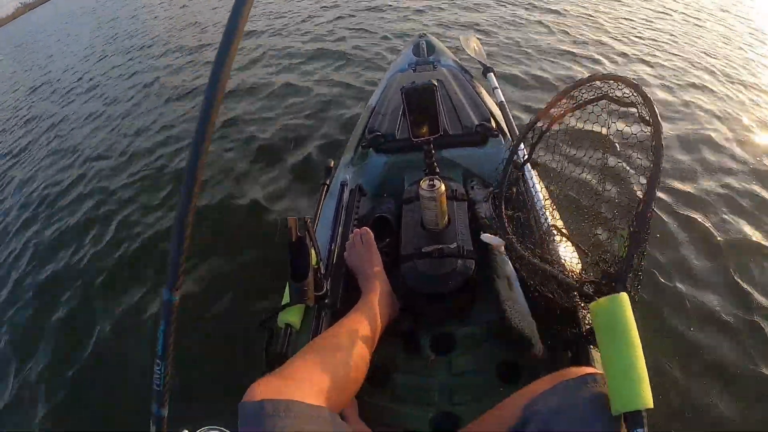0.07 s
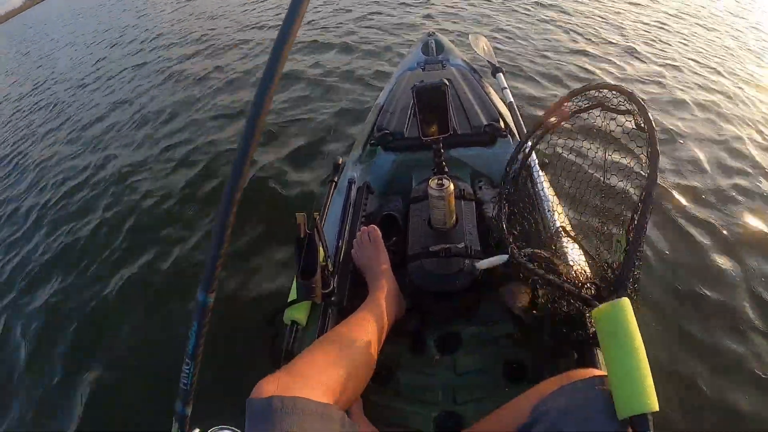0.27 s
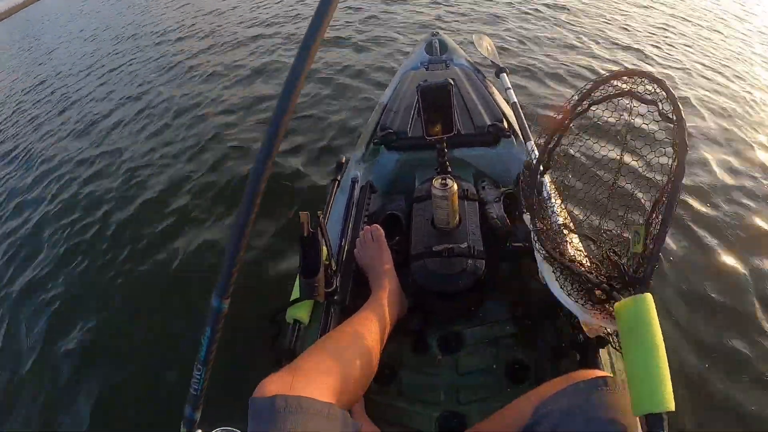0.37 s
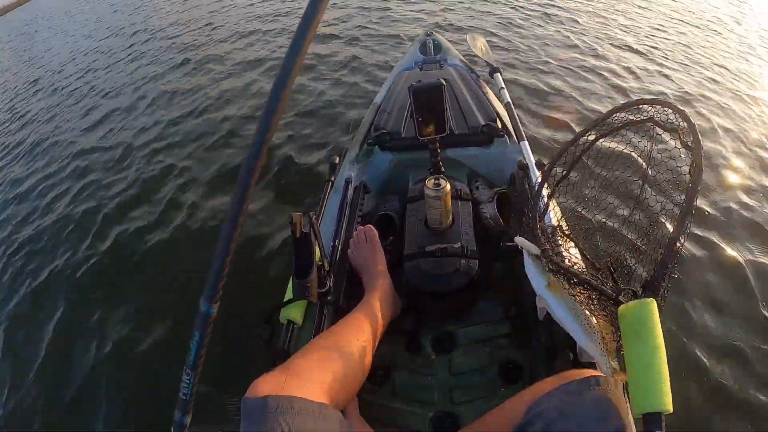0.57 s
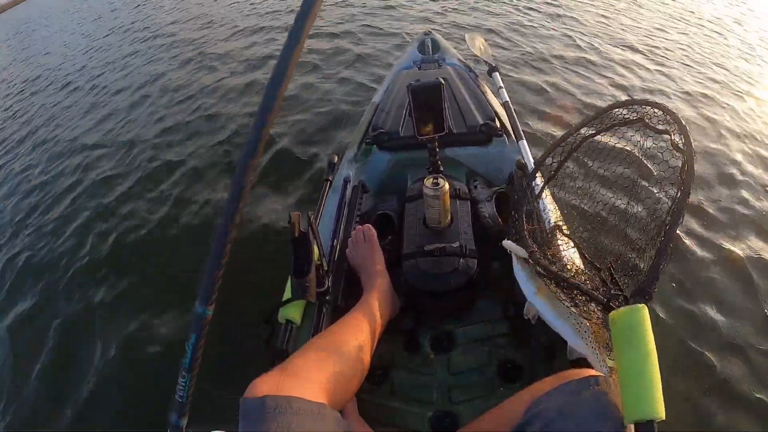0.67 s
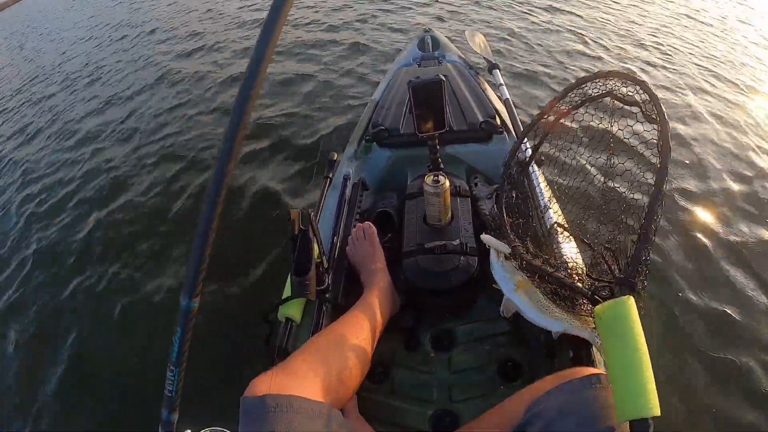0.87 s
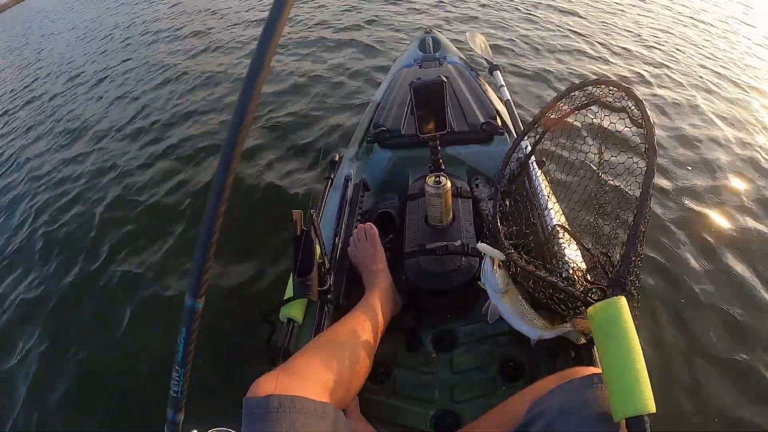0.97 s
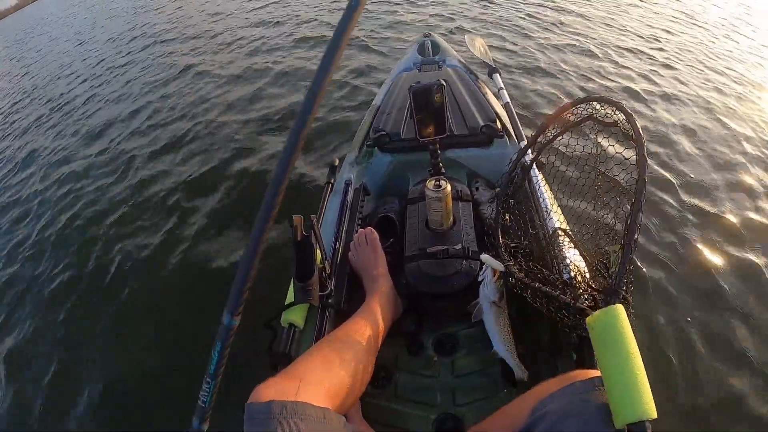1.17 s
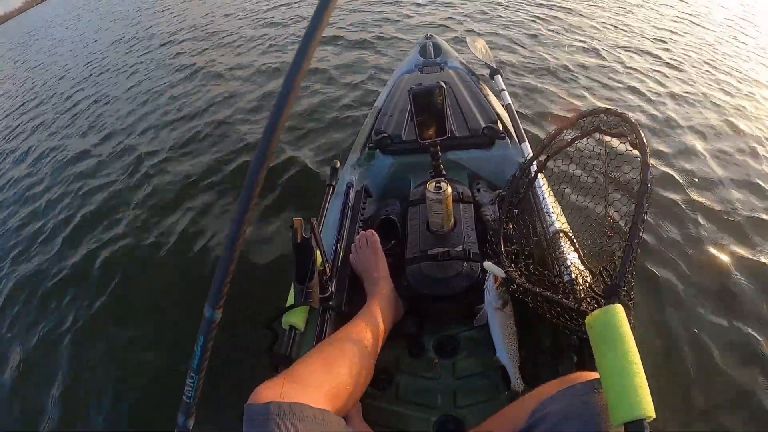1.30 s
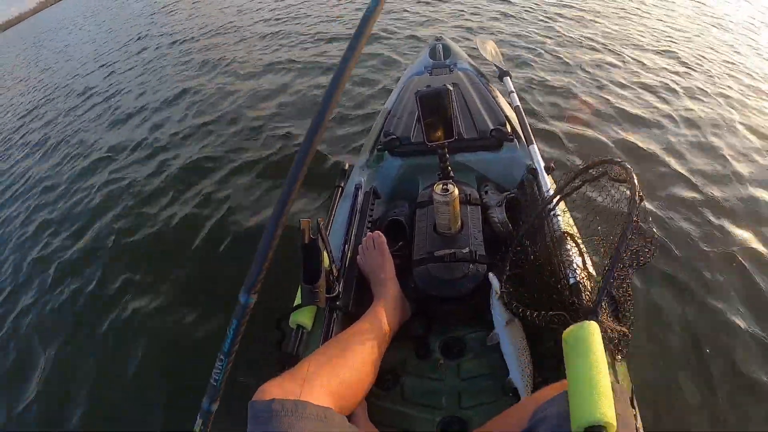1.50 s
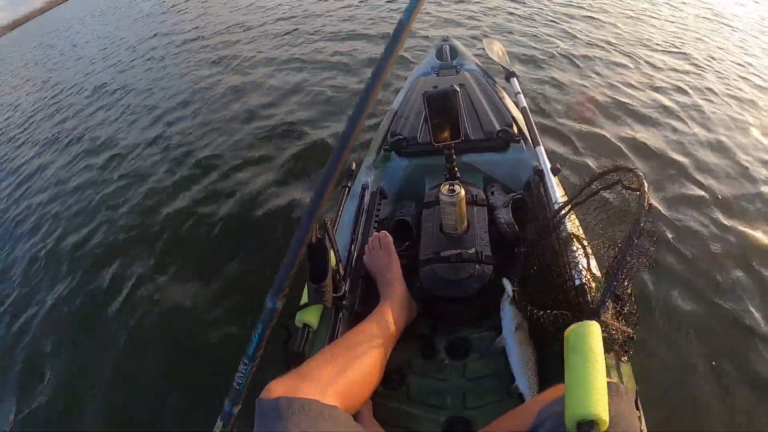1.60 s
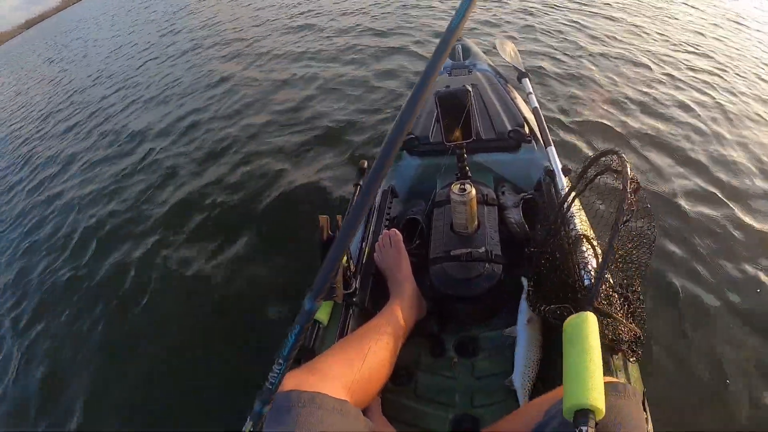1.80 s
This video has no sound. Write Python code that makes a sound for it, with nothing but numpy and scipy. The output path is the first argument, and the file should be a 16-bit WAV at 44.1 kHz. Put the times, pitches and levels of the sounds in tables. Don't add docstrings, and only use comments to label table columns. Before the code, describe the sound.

Fish flapping on a kayak deck: a boomy slap, a busy burst of wet net snaps, a quieter gap, a deeper second slap, light scrapes and a small knock, heard close up on open water with low wind.

```python
import sys
import numpy as np
from scipy import signal
from scipy.fft import rfft, irfft
from scipy.io import wavfile
from scipy.ndimage import uniform_filter1d

SR = 44100
rng = np.random.default_rng(int(sys.argv[2]) if len(sys.argv) > 2 else 0)


def wrap_up_sound(samples):
    columns = np.atleast_2d(samples).T
    tamed = np.clip(columns, -1, 1)
    steps = np.round(tamed * 32767).astype(np.int16)
    wavfile.write(sys.argv[1], SR, steps)


def nominal_scale(level):
    x = np.asarray(level, float) / 20
    return 10 ** x


N = 81585

# (time [s], level [dB], contact [ms])
FIRST_FLAP = [
    (.2403, -20, 0.27),
    (.2437, -9, 1.46),
    (.2930, -25.5, 2.1),
    (.3250, -30, 1.5),
]
SECOND_FLAP = [
    (1.1860, -20.5, 1.57),
    (1.191, -8, 1.65),
    (1.195, -13.5, 1.97),
    (1.2110, -18, 1.01),
    (1.2350, -19, 3.9),
]
# (pitch [Hz], level [dB], time to fade by 60 dB [s])
FORE_HULL_MODES = [(195.4, 7.5, 0.088), (226, 4, 0.072), (257, 3.5, 0.025), (347, -3.5, 0.058),
                   (414, -13, 0.1), (540, -12.5, 0.057), (833, -2.5, 0.049), (1157, -21, 0.016),
                   (1706, -7.5, 0.041)]
AFT_HULL_MODES = [(80.3, 0.5, 0.32), (120.5, -3.5, 0.29), (153, 6, 0.053), (186, 5, 0.053),
                  (255, -15, 0.12), (324.6, -2.5, 0.1), (447, -16.5, 0.078), (495, -8, 0.037),
                  (592, -11, 0.052), (775, 0.5, 0.027), (952, -2.5, 0.047)]
# (time [s], level [dB])
KNOCKS = [
    (1.8318, -27.5),
    (1.8335, -24.5),
    (1.8399, -38),
]
# (pitch [Hz], level [dB], time to fade by 60 dB [s])
HANDLE_MODES = [(190, -4.5, 0.047), (390, -8, 0.063), (640, -6, 0.026), (900, -30, 0.0082),
                (1143, -12, 0.052), (1436, 5.5, 0.018), (2686, -4, 0.041), (4480, -1, 0.021)]
# (time [s], peak [dB], pitch [Hz], time to fade by 60 dB [s])
BRIGHT_SNAPS = [(0.0004, -32, 3900, 0.06), (.029, -32, 2900, .03), (0.0235, -31.5, 2910, 0.056),
                (0.0441, -41, 2860, 0.015), (0.146, -43, 3500, 0.031), (0.2406, -18.5, 4450, 0.032),
                (.0535, -40.5, 3000, 0.021), (.068, -35.5, 3660, 0.023), (.2885, -38, 4000, 0.043),
                (0.2945, -32, 3900, 0.038), (0.3014, -32.5, 4170, 0.05), (0.318, -35.5, 3050, 0.079),
                (0.337, -44, 2910, 0.023), (0.3655, -25, 6900, 0.053), (0.3755, -26, 3900, 0.04),
                (.3803, -23.5, 3440, 0.046), (.3915, -48, 3140, 0.025), (.3985, -27.5, 3000, 0.037),
                (.4045, -28, 4400, 0.039), (.4098, -22.5, 5310, 0.054), (.4175, -27, 3530, 0.033),
                (.429, -34, 3100, 0.027), (0.4348, -26, 3000, 0.027), (0.4419, -16.5, 3560, 0.028),
                (0.4525, -29, 3030, 0.05), (0.4607, -26, 4020, 0.036), (0.5112, -37, 3650, 0.027),
                (0.5292, -34.5, 3600, 0.054), (.539, -34, 5270, 0.05), (0.5537, -33, 3230, 0.058),
                (0.5625, -39, 3400, 0.02), (.5905, -42.5, 6000, 0.038), (.604, -46, 3220, 0.033),
                (.613, -52, 5897, 0.018), (.6335, -33.5, 3500, 0.015), (0.6426, -37, 3250, 0.046),
                (0.6603, -29, 2650, 0.016), (0.6655, -34.5, 5500, 0.02), (0.6859, -37, 2690, 0.019),
                (.702, -45, 2290, 0.017), (.7617, -50, 2800, 0.033), (.7705, -56.5, 6000, 0.019),
                (0.7255, -43.5, 4670, 0.017), (1.182, -38.5, 2900, 0.06), (1.2097, -15, 3660, 0.019),
                (1.2244, -35, 3600, 0.026), (1.1915, -37, 2760, 0.012), (1.2455, -39, 2930, 0.032),
                (1.2895, -35.5, 5600, 0.022), (1.299, -54, 4500, 0.023), (1.3265, -50, 3830, 0.019)]
# (time [s], peak [dB], pitch [Hz], time to fade by 60 dB [s])
DULL_SNAPS = [(0.052, -35, 1640, 0.019), (0.066, -36.5, 1410, 0.023), (0.092, -42, 970, 0.026),
              (0.132, -42.5, 1500, 0.037), (0.2402, -29, 1220, 0.087), (0.392, -15, 1614, 0.045),
              (0.4105, -21, 1120, 0.06), (0.5, -45, 1020, 0.025), (0.634, -38, 1620, 0.015),
              (0.93, -54, 980, 0.031), (1.191, -21.5, 900, 0.13), (1.244, -43.5, 1070, 0.19),
              (1.2596, -33, 1700, 0.02), (1.461, -40, 1520, 0.033), (1.56, -42, 1050, 0.047),
              (1.578, -37.5, 1380, 0.017), (1.832, -27.5, 1120, 0.064)]
# (frequency [Hz], level [dB per Hz])
SNAP_COLOUR = [(350, -23), (600, -9), (1750, -1.5), (3820, -7), (8700, -10), (10500, -27), (13000, -25.5),
               (15900, -40)]
# (time [s], level [dB])
SHAKE = [(0, -56), (.075, -68), (.085, -71.5), (.22, -64.5), (.28, -61.5), (.36, -54), (.47, -50),
         (.49, -58.5), (.55, -54), (.62, -62.5), (.67, -57.5), (.72, -69), (.8, -81), (1.17, -69),
         (1.22, -53), (1.3, -64.5), (1.35, -76), (1.85, -62.5)]
# (frequency [Hz], level [dB per Hz])
RUSTLE_COLOUR = [(350, -35), (600, -12.5), (1570, -0.5), (2670, -1), (3380, -6.5), (7180, -13),
                 (15900, -30)]
# (start [s], length [s], level [dB], fade-in [s])
SLIDES = [
    (-.02, 0.49, -50.5, 0.012),
    (0.952, 0.083, -50, 0.008),
    (0.955, 0.37, -55, 0.019),
    (1.452, 0.11, -56.5, 0.024),
    (1.499, 0.083, -53.5, 0.071),
    (1.617, 0.32, -59.5, 0.093),
]
# (frequency [Hz], width [Hz], level [dB])
SLIDE_RINGS = [
    [(279, 82, 0)],
    [(940, 230, 1.5), (1380, 210, 4.5), (1850, 190, 6.5), (3100, 670, -13.5)],
    [(308, 290, 14), (2050, 120, 0.5), (3900, 110, -6)],
    [(1143, 50, 2), (1430, 430, -1.5), (4170, 1400, -12)],
    [(4060, 210, 5), (8570, 300, -9)],
    [(1700, 270, 0.5), (2370, 380, 3), (3800, 940, -6), (6900, 1800, -14.5)],
]
# (start [s], length [s], level [dB], fade-in [s])
SOFT_NOISES = [
    (.215, 0.087, -62.5, 0.028),
    (.345, .05, -56, 0.013),
    (.372, 0.044, -41.5, 0.012),
    (.56, 0.089, -55, .015),
    (.634, 0.022, -66, .004),
    (.928, 0.056, -51, 0.0041),
]
# (frequency [Hz], width [Hz], level [dB])
SOFT_NOISE_RINGS = [
    [(6900, 340, 0), (3800, 810, -2)],
    [(7100, 400, 0)],
    [(230, 87, 0.45), (405, 99, -2.5)],
    [(3350, 400, 2), (5000, 500, -12)],
    [(8000, 260, 0)],
    [(348, 160, -0.21), (584, 130, -2.8), (1000, 290, 0.72)],
]
# (time [s], level [dB])
GUST = [(0, -40.5), (.2, -42), (.3, -35.5), (.39, -36), (.45, -46.5), (.79, -47.5), (.825, -37), (.87, -47),
        (.97, -43.5), (1.1, -47.5), (1.4, -49.5), (1.55, -44), (1.65, -45), (1.74, -42.5), (1.85, -44)]
# (frequency [Hz], level [dB per Hz])
WIND_COLOUR = [(12, -29.5), (20, -5), (75, -10.5), (109, -14), (140, -7), (229, -12), (700, -32),
               (910, -69), (1540, -120)]
# (frequency [Hz], level [dB per Hz])
WATER_COLOUR = [(300, -11.5), (450, -21.5), (800, -3.5), (1500, -4.5), (2100, -15.5), (3000, -26),
                (8000, -50), (10000, -56), (15900, -77)]


def rms_one(x):
    return x / np.sqrt(np.mean(x ** 2) + 1e-20)


def in_time(rows):
    return np.interp(np.arange(N) / SR, *np.transpose(rows))


def drift(rate_hz):
    step = 40
    r = np.exp(-2 * np.pi * rate_hz * step / SR)
    noise = rng.standard_normal(N // step + 2002)
    slow = signal.lfilter([1], [1, -2 * r, r * r], noise)[2000:]
    return np.interp(np.arange(N) / step, np.arange(len(slow)), rms_one(slow))


def colour(x, points):
    hz = np.fft.rfftfreq(len(x), 1 / SR) + 1e-3
    at, db = np.transpose(points)
    gain = nominal_scale(np.interp(np.log(hz), np.log(at), db, -90, -90))
    return irfft(rfft(x) * gain, len(x))


def filtered(x, order, hz, kind):
    return signal.sosfilt(signal.butter(order, hz, kind, fs=SR, output="sos"), x)


def ring(x, hz, t60):
    r = nominal_scale(-60 / (t60 * SR))
    w = 2 * np.pi * hz / SR
    return signal.lfilter([0, np.sin(w)], [1, -2 * r * np.cos(w), r * r], x + 1e-18)


def resonance(x, hz, width_hz):
    r = np.exp(-np.pi * width_hz / SR)
    top = np.array([1, 0, -1]) * (1 - r * r) / 2
    return signal.lfilter(top, [1, -2 * r * np.cos(2 * np.pi * hz / SR), r * r], x)


def struck(blows, modes):
    force = np.zeros(N + SR)
    for s, db, contact_ms in blows:
        start = int(s * SR)
        through = np.clip(np.arange(400) / (contact_ms * SR / 1000), 0, 1)
        push = np.sin(np.pi * through)
        force[start:start + 400] += nominal_scale(db) * push / push.sum()
    out = np.zeros(N)
    for k, (hz, db, t60) in enumerate(modes):
        out += (-1) ** k * nominal_scale(db) * ring(force[:N], hz, t60)
    return out


def grains(per_s, spread_db):
    excess = np.minimum(rng.exponential(1, N), 5)
    sizes = nominal_scale(spread_db * excess) * rng.choice([-1, 1], N)
    return rms_one(sizes * (rng.random(N) < per_s / SR))


def crackle(per_s, spread_db, spectrum):
    clicks = grains(per_s, spread_db)
    dealt = rng.integers(0, 24, N)
    total = np.zeros(N)
    for k, hz in enumerate(np.geomspace(500, 15000, 24)):
        rung = ring(clicks * (dealt == k), hz, 22 / hz)
        total += rms_one(resonance(rung, hz, hz / 4)) * np.sqrt(hz)
    return rms_one(colour(total * signal.windows.tukey(N, 1 / 200), spectrum))


def rubbing(strokes, stroke_rings):
    fade_out_s = 0.041
    t = np.arange(N) / SR
    out = np.zeros(N)
    for (s, length, db, in_s), rings in zip(strokes, stroke_rings):
        rub = rng.standard_normal(N)
        body = np.zeros(N)
        for k, (hz, width_hz, ring_db) in enumerate(rings):
            tone = resonance(resonance(rub, hz, width_hz), hz, hz)
            body += (-1) ** k * nominal_scale(ring_db) * tone
        shape = np.clip(np.minimum((t - s) / in_s, (s + length - t) / fade_out_s), 0, 1)
        out += nominal_scale(db + 1.4 * drift(48)) * shape * rms_one(body)
    return out


def hull():
    boom = struck(FIRST_FLAP, FORE_HULL_MODES) + struck(SECOND_FLAP, AFT_HULL_MODES)
    return filtered(boom, 2, 148, "high")


def snaps():
    trim_db, tone_db, ring_q = -2.4, 2.5, 5.3
    rise_share, top_multiple = 0.028, 5
    crack_db, crack_t60 = -12.5, 0.028
    fine = crackle(9000, 2.5, SNAP_COLOUR)
    coarse = rms_one(colour(grains(3000, 3.0), SNAP_COLOUR))
    grit = np.pad(fine + coarse, (0, SR))
    clicks = np.pad(grains(9000, 2.0), (0, SR))
    out = np.zeros(N + SR)
    t = np.arange(SR // 10) / SR
    for s, db, hz, t60 in list(BRIGHT_SNAPS) + list(DULL_SNAPS):
        start = int(s * SR)
        at = slice(start, start + len(t))
        tone = rms_one(resonance(resonance(clicks[at], hz, hz / ring_q), hz, hz / 2))
        dulled = rms_one(filtered(grit[at], 3, min(top_multiple * hz, .45 * SR), "low"))
        rise = 1 - np.exp(-t / (rise_share * t60))
        fade = nominal_scale(-60 * t / t60) + nominal_scale(crack_db - 60 * t / crack_t60)
        burst = rise * fade * (dulled + nominal_scale(tone_db) * tone)
        out[at] += nominal_scale(db + trim_db) * burst / np.abs(burst).max()
    return out[:N]


def handle():
    return struck([(s, db, .25) for s, db in KNOCKS], HANDLE_MODES)


def soft_noises():
    return rubbing(SOFT_NOISES, SOFT_NOISE_RINGS)


def slides():
    return rubbing(SLIDES, SLIDE_RINGS)


def rustle():
    return nominal_scale(in_time(SHAKE) + 1.55 * drift(39)) * crackle(12000, 2.2, RUSTLE_COLOUR)


def wind():
    lumps = nominal_scale(1.2 * drift(12))
    air = rms_one(colour(rng.standard_normal(N) * lumps, WIND_COLOUR))
    low = filtered(air, 3, 100, "low")
    even = low / np.sqrt(uniform_filter1d(low ** 2, size=3500))
    steady = rms_one(filtered(air[::-1], 2, 110, "high"))
    return nominal_scale(in_time(GUST) + 3) * even + nominal_scale(-52) * steady


def water():
    patchy_db = 1.5 * drift(10)
    return nominal_scale(-63.5 + patchy_db) * rms_one(colour(rng.standard_normal(N), WATER_COLOUR))


def scene():
    fish_and_net = hull() + snaps() + handle() + soft_noises() + slides() + rustle()
    return (fish_and_net + wind() + water())[None]


def band_limit(x):
    return signal.sosfilt(signal.butter(12, 16050, fs=SR, output="sos"), x)


def record(dry):
    steep = signal.cheby2(12, 70, 16050, fs=SR, output="sos")
    mix = signal.sosfilt(steep, dry)
    return band_limit(mix)


dry = scene()
out = record(dry)
wrap_up_sound(out)
```